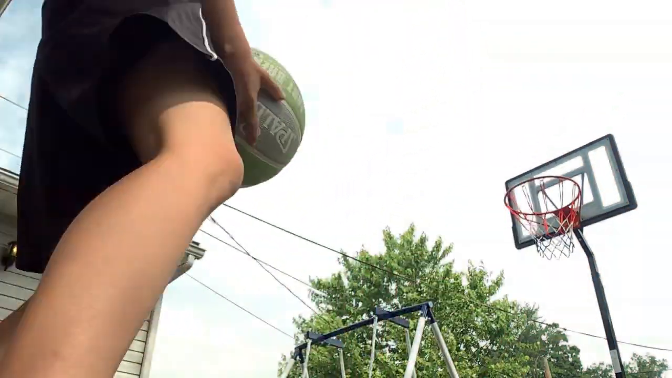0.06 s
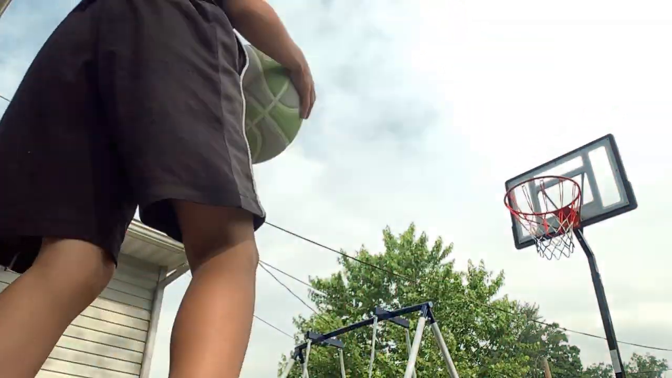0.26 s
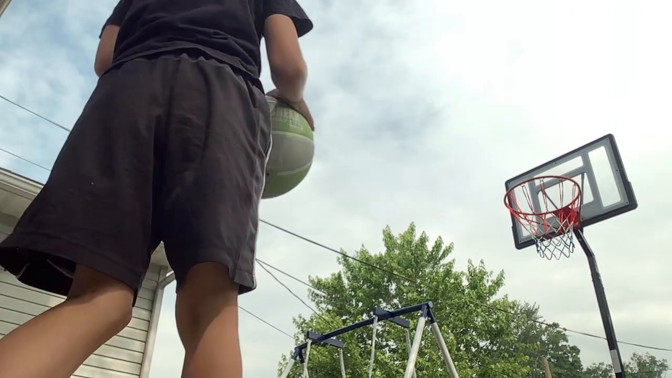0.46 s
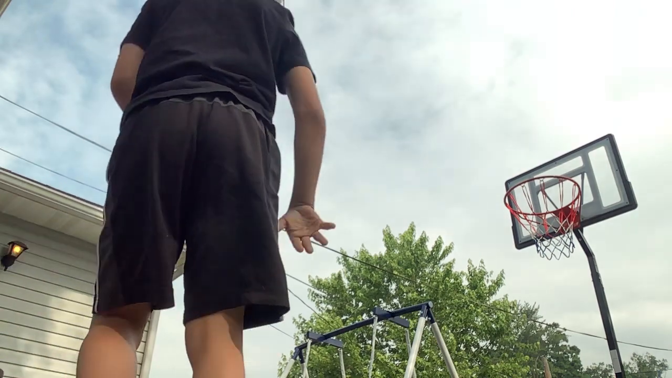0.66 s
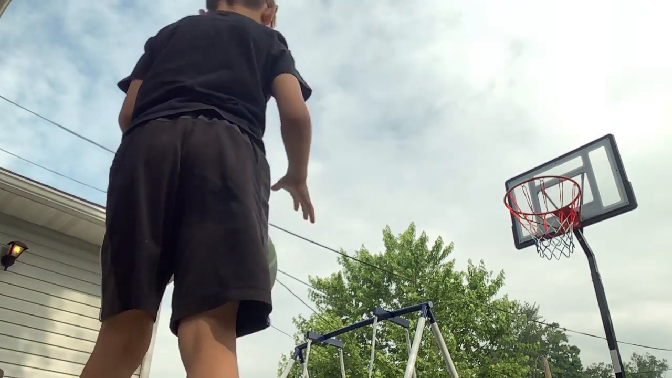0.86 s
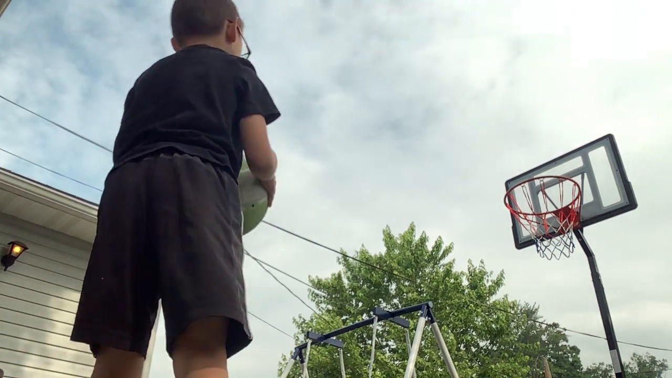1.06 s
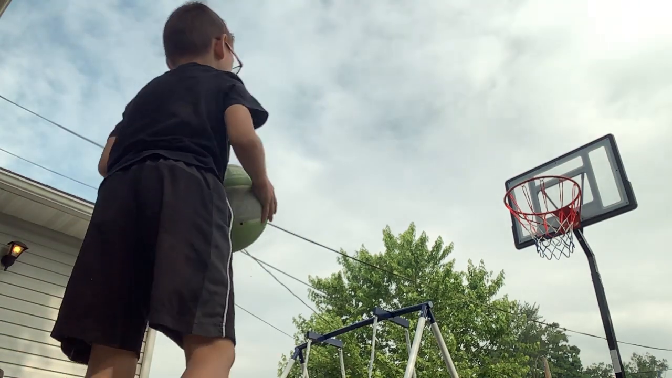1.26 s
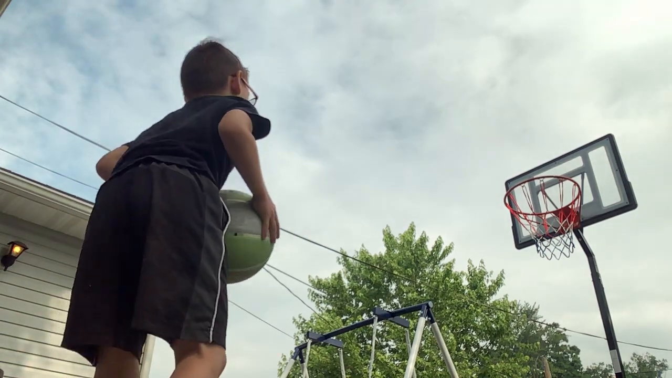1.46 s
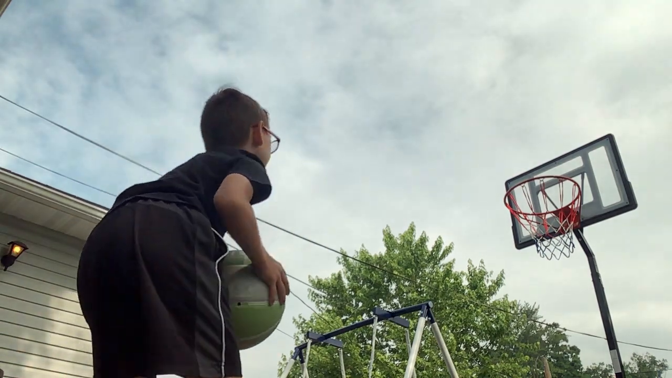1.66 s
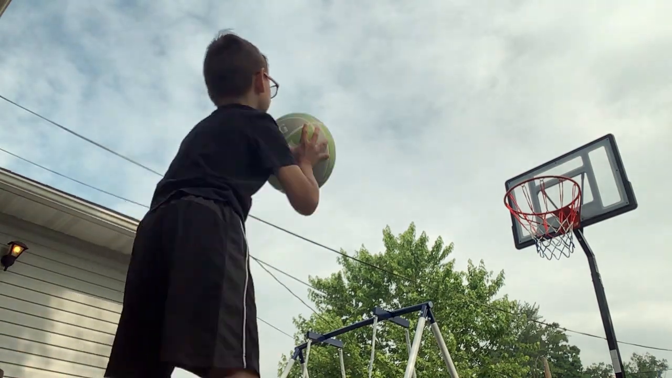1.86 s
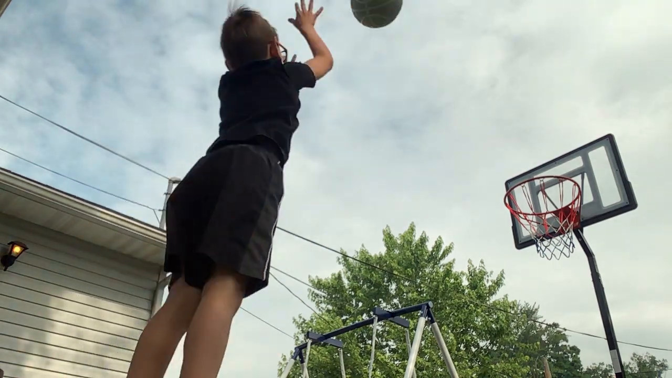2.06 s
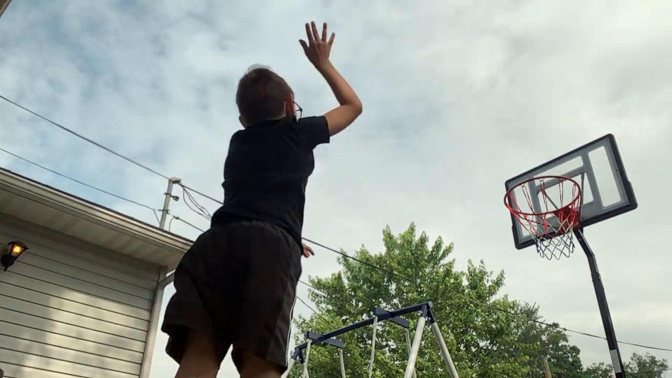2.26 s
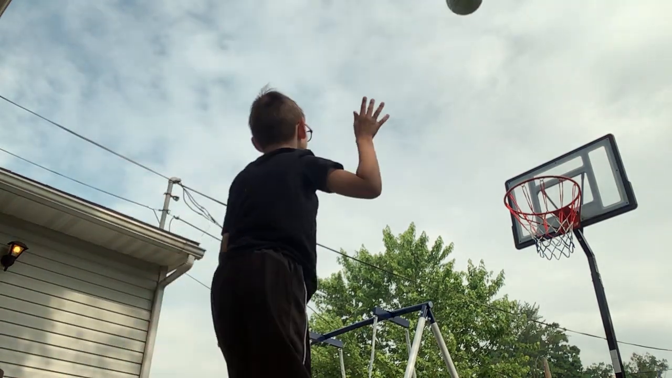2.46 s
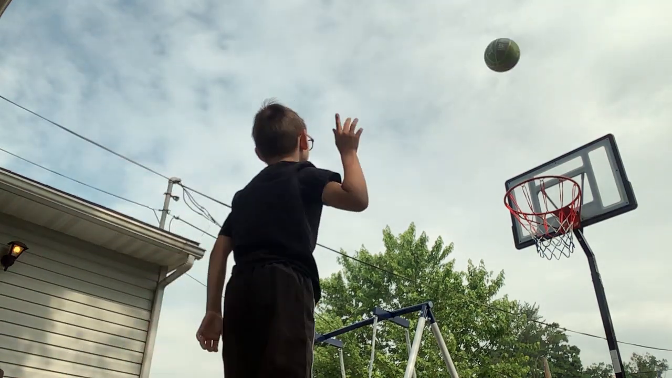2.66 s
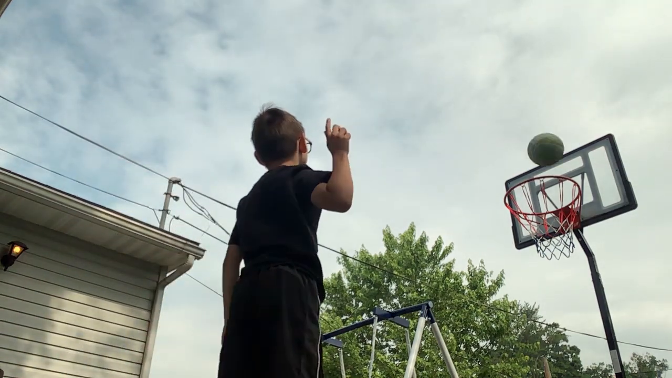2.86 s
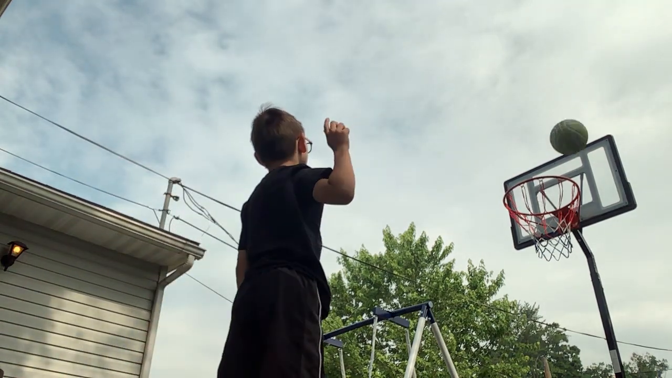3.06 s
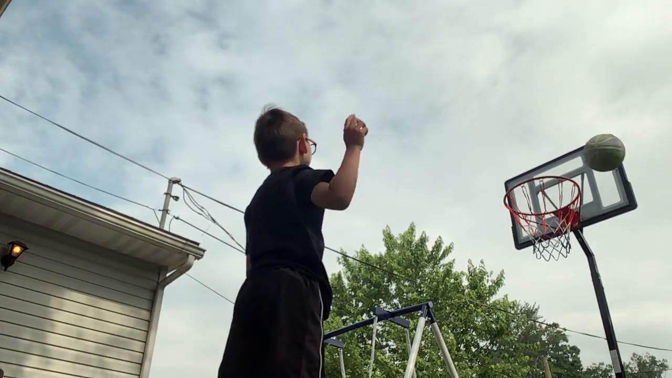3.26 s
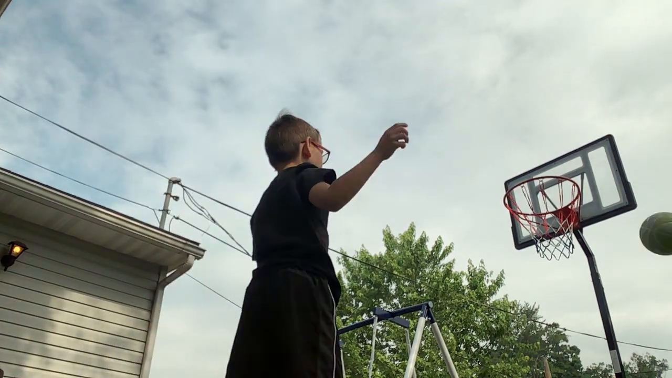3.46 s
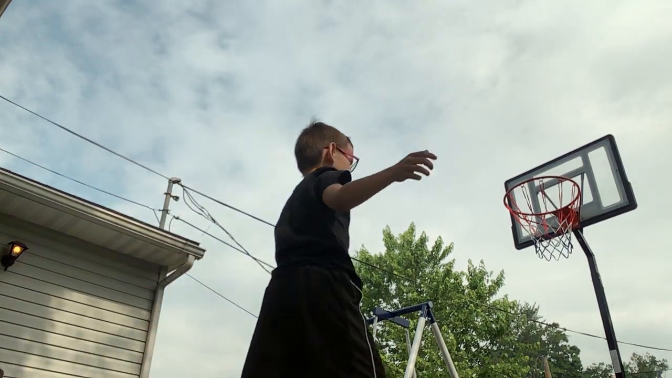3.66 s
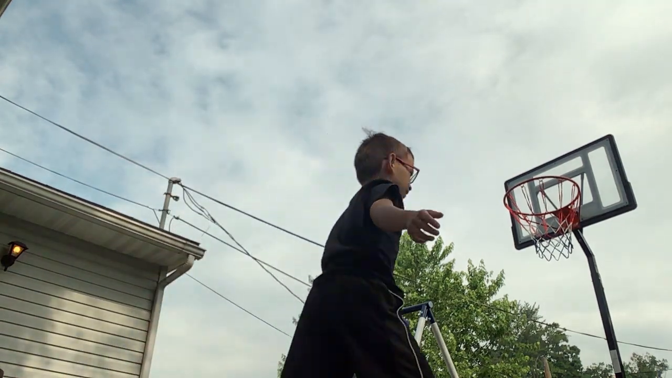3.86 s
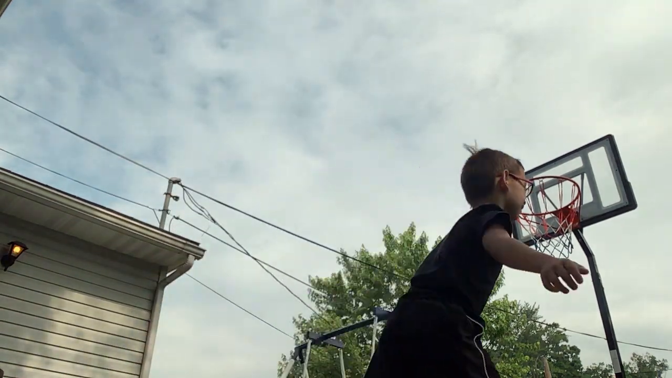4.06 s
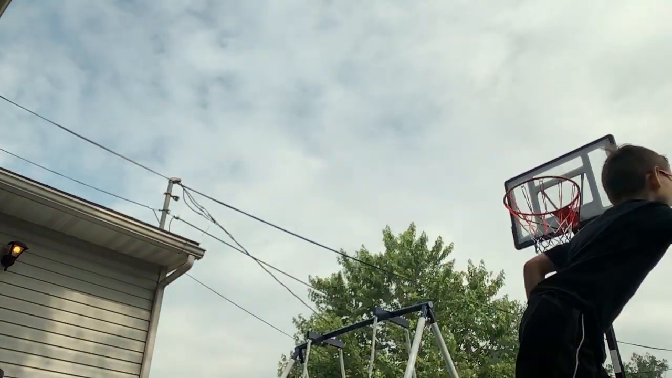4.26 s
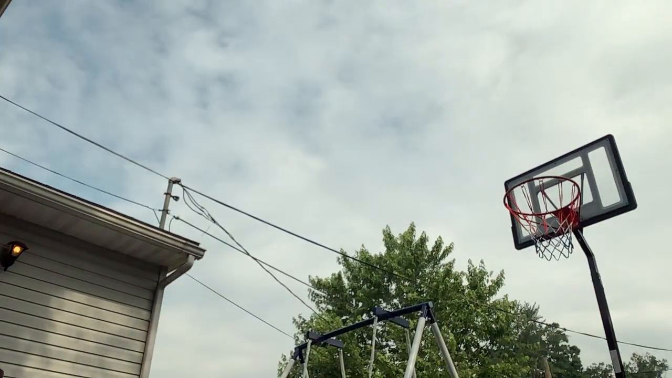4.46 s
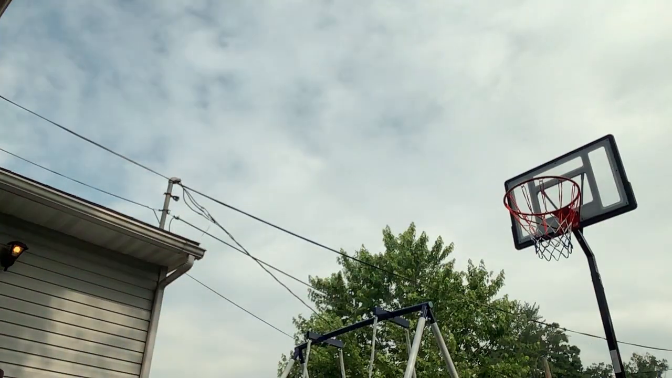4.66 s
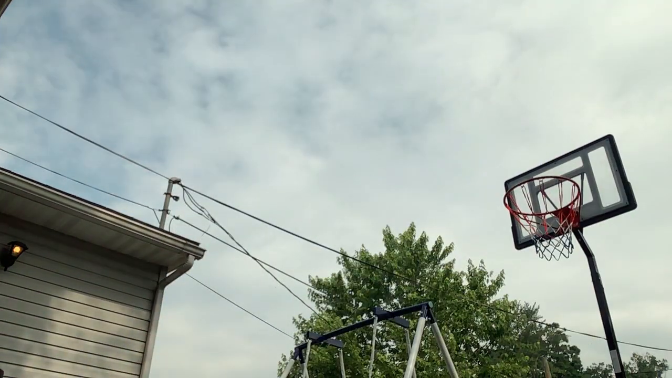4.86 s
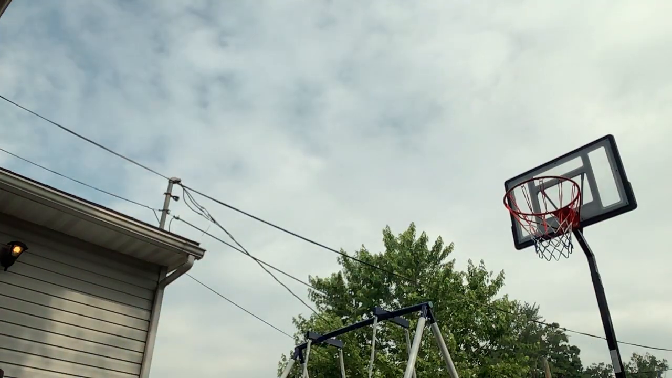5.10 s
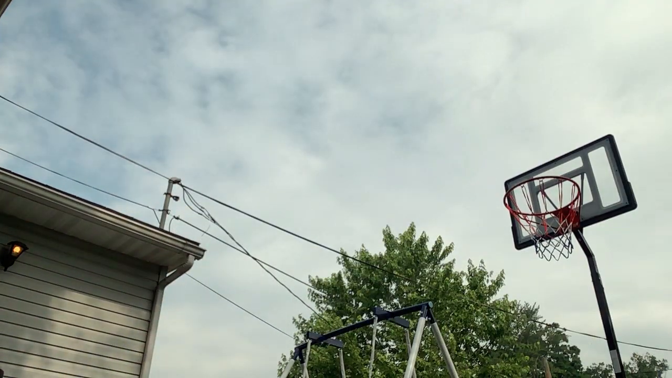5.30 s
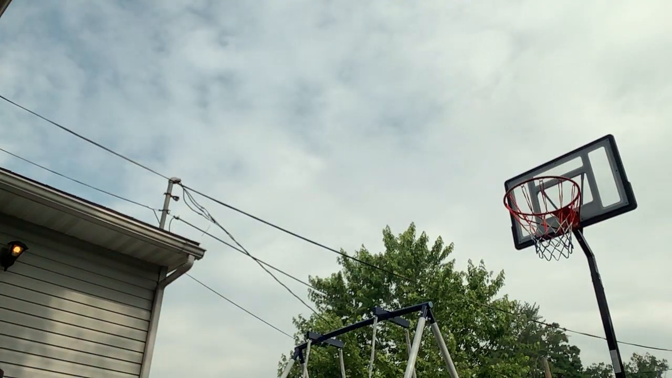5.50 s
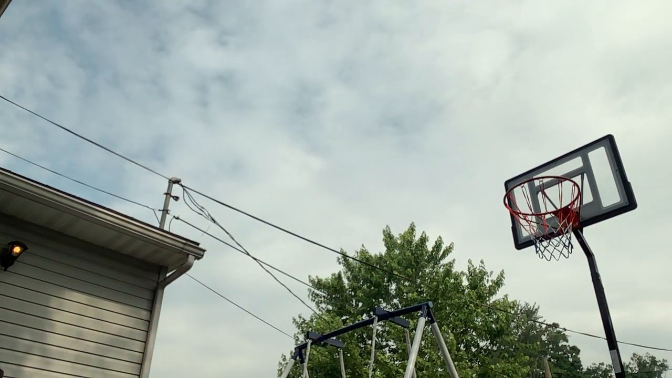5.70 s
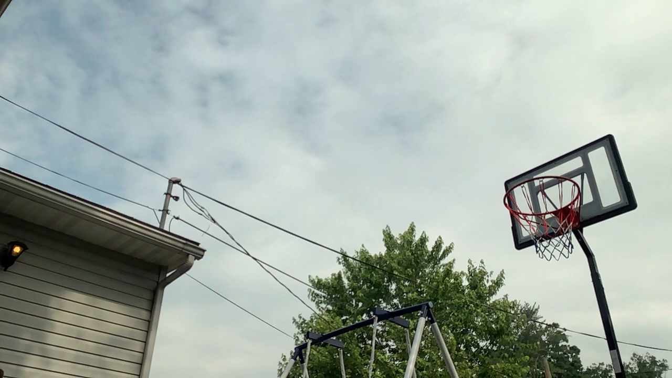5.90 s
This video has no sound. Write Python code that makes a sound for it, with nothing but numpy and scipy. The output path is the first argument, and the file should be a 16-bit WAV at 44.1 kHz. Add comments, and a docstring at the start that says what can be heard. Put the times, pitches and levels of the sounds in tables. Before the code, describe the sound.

A quiet backyard with low distant traffic, a faint wavering hum and sparse, weak, high bird chirps. Shoe soles drag on grit at the very start, then a crisp scrape and small step come at about 0.5 s. At 0.7 s a basketball hits the paving close by: a loud hollow thump, falling in pitch, with a ringing slap and a trace of crushed sand. A small step follows at 1.0 s, then a landing step and gritty scuffs around 2.3 and 2.6 s. At 2.9 s the ball hits the hoop: a brief steel clang and loose clatter, with a rapid low shudder of the backboard fading by about 3.2 s. The ball lands at 3.8 s, duller, with a strong wall echo, and bounces again at 4.8 and 5.4 s, each weaker. Footsteps thud near 4.7, 5.0 and faintly 5.7 s; raspier chirps sound near 4.6 s. Ground-level phone pickup, little deep bass.

```python
"""Backyard paving between house walls: a basketball is dribbled once and shot at a portable hoop.
The ball is thumps of falling pitch, ringing slaps and crushed sand; wall echoes are dulled delayed copies.
Rim and backboard are decaying modes, the clatter decaying noise, the shudder a train of thumps.
Shoes scuff and step in bands of grainy noise and small thuds.
Behind: gliding chirps smeared by trees, and a town of coloured noise with a wavering hum."""
import sys
import numpy as np
from scipy import signal
from scipy.fft import rfft, irfft
from scipy.io import wavfile
from scipy.ndimage import uniform_filter1d

SR = 44100
rng = np.random.default_rng(int(sys.argv[2]) if len(sys.argv) > 2 else 0)


def to_wav(sig):
    """Store sig (one row per channel, or 1-D mono) as 16-bit WAV at the path in sys.argv[1].

    Samples outside -1..1 are clipped; the rate is SR.
    """
    pcm = np.clip(np.atleast_2d(sig), -1, 1) * 32767
    pcm = np.round(pcm).astype(np.int16)
    wavfile.write(sys.argv[1], SR, pcm.T)  # frames by channels


N = 261760
AGE_S = np.arange(int(0.8 * SR)) / SR  # time base of one event


def undb(db):
    """Decibels to gain."""
    return 10 ** (np.asarray(db) / 20)


def unit(x):
    """Scale to rms 1."""
    return x / np.sqrt(np.mean(x ** 2))


def noise():
    """White noise, one event long."""
    return rng.standard_normal(len(AGE_S))


def add(out, start_s, x):
    """Mix x into out from start_s."""
    i = max(int(round(start_s * SR)), 0)
    out[i:i + len(x)] += x[:max(len(out) - i, 0)]


def lowpass(x, cutoff_hz, order=2):
    """Butterworth low-pass."""
    sos = signal.butter(order, min(cutoff_hz, SR / 2 - 100), fs=SR, output="sos")
    return signal.sosfilt(sos, x)


def log_hz(n):
    """Log frequency of each bin of an n-point spectrum."""
    return np.log(np.maximum(np.fft.rfftfreq(n, 1 / SR), 1))


def colour(x, points):
    """Shape x by (f/Hz, level/dB) points; rms 1."""
    hz, db = np.transpose(points)[:2]
    gain = undb(np.interp(log_hz(len(x)), np.log(hz), db))
    return unit(irfft(rfft(x) * gain, len(x)))


def ring(modes, blur=0.0):
    """Sum of decaying sines; blur, a share of pitch, widens each line by random phase drift."""
    out = 0
    for hz, db, t60_s in modes:
        drift = np.cumsum(noise()) * np.sqrt(2 * np.pi * abs(blur) * hz / SR)
        out = out + undb(db - 60 * AGE_S / t60_s) * np.sin(2 * np.pi * hz * AGE_S + drift)
    return out


def dense_ring(bands):
    """Countless modes: noise whose bands each die at their own pace."""
    spectrum = rfft(colour(noise(), bands))
    log_f = log_hz(len(AGE_S))
    hz, _, t60_s = np.transpose(bands)
    out = 0
    for weights, decay_s in zip(np.eye(len(hz)), t60_s):
        band = irfft(spectrum * np.interp(log_f, np.log(hz), weights), len(AGE_S))
        out = out + band * undb(-60 * AGE_S / decay_s)
    return out


def thump(hz, swell_s, sag=0.28, tight=9.1):
    """Soft thump: cycles swell to swell_s, pitch falling through hz there, then die."""
    u = AGE_S / swell_s
    pitch_hz = hz * (1 + sag * (1 - np.minimum(u, 2)))
    cycles = np.cumsum(pitch_hz) / SR
    cycles_at_peak = np.interp(swell_s, AGE_S, cycles)
    envelope = (u * np.exp(1 - u)) ** tight
    return -envelope * np.cos(2 * np.pi * (cycles - cycles_at_peak))


def walk(rate_hz):
    """Smoothed random steps at rate_hz; rms 1 over the scene."""
    k = int(SR / rate_hz)
    held = np.repeat(rng.standard_normal(N // k + 1), k)[:N]
    return unit(uniform_filter1d(held, k))


# ball on the ground: [t/s, thump level/dB, thump f/Hz, knock f/Hz, slap level/dB, slap cut-off f/Hz,
# grit level/dB, wall echo level/dB re the hit]
BALL_BOUNCES = [(0.7148, -10.5, 127, 320, -8.5, 2200, -32.5, -18.5),
                (3.7644, -13, 127.7, 725, -21, 1300, -57, -6.5),
                (4.799, -17.5, 118, 480, -20.5, 730, -52.5, -10.5),
                (5.3562, -22, 237, 373, -33, 714, -68, -13)]
# ringing colour of the ball's slap: low body, a cluster near 1 kHz, faint higher lines:
# [f/Hz, level/dB, t60/s]
SLAP_MODES = [(254, 4, 0.037), (437, -2, 0.074), (677, -15.5, 0.015), (1142, 1.5, 0.028),
              (1330, -9.5, 0.035), (1000, -9.5, 0.065), (1570, -47, .1), (1620, -30, 0.13),
              (2274, -19, .035), (2810, -24.5, 0.071), (3550, -44.5, 0.15), (5033, -45.5, .15)]
# sand crushed under the ball: [f/Hz, level/dB]
SAND_COLOUR = [(250, 5.5), (600, 3), (1400, 1), (2900, 0), (4500, -13.5), (8000, -19), (16000, -29)]
THUMP_SWELL_CYCLES = 2.036  # cycles of its nominal pitch up to the peak
KNOCK_DB, KNOCK_SWELL_CYCLES = -9.5, 1.617  # first touch; re the thump
PAVING_DB, PAVING_TOP_HZ = -17, 740  # dull crunch; re the thump
LAND_S, REBOUND_S, LAND_DB = 0.00343, 0.00676, -8  # REBOUND_S after landing; LAND_DB re the slap
CONTACT_S, SAND_FALL_S = 0.00098, 0.0027
SKITTER_DB, SKITTER_T60_S = -19, 0.36
WALL_DELAY_S, WALL_TOP_HZ = 0.027, 430  # nearest house wall
FAR_WALL_RATIO, FAR_WALL_DB = 1.7, -3  # delay and level re the nearest wall


def ball():
    """Ball knocks and thumps, slaps on landing and again on springing back; two walls answer."""
    out = np.zeros(N)
    slap_ring = ring(SLAP_MODES)
    slap_ring /= np.abs(slap_ring).max()
    contact = 1 - np.exp(-AGE_S / CONTACT_S)  # contact patch spreads
    crack = 2 * np.exp(-AGE_S / SAND_FALL_S)
    skitter = undb(SKITTER_DB - 60 * AGE_S / SKITTER_T60_S)
    for t_s, thump_db, hz, knock_hz, slap_db, slap_hz, grit_db, echo_db in BALL_BOUNCES:
        sand = contact * (crack + skitter) * colour(noise(), SAND_COLOUR)
        paving = undb(PAVING_DB) * lowpass(sand, PAVING_TOP_HZ)
        body = thump(hz, THUMP_SWELL_CYCLES / hz, sag=0.54)
        knock = undb(KNOCK_DB) * thump(knock_hz, KNOCK_SWELL_CYCLES / knock_hz, sag=0.33, tight=4.8)
        hit = undb(thump_db) * (body + knock + paving) + undb(grit_db) * sand
        slap = undb(slap_db) * lowpass(slap_ring * contact, slap_hz, order=3)
        add(hit, LAND_S, undb(LAND_DB) * slap)
        add(hit, LAND_S + REBOUND_S, -slap)
        echo = undb(echo_db) * lowpass(hit, WALL_TOP_HZ, order=3)
        add(out, t_s, hit)
        add(out, t_s + WALL_DELAY_S, echo)
        add(out, t_s + FAR_WALL_RATIO * WALL_DELAY_S, undb(FAR_WALL_DB) * echo)
    return out


# ball against the rim, then the loose mount rattling: [t/s, clatter level/dB, ring level/dB]
HOOP_HITS = [(2.9265, -39, -66), (2.9414, -28.5, -36), (2.967, -35, -57.5), (3.0478, -47, -51),
             (3.186, -65, -66), (3.283, -69, -69)]
# steel rim and bracket: [f/Hz, level/dB, t60/s]
RIM_MODES = [(510, -8, 0.52), (760, 3, 0.23), (847, 2.5, 0.15), (965, -9, 0.093), (1176, -3.5, 0.3),
             (1436, -4.5, 0.18), (1507, 6.5, 0.16), (1526, -12, 0.39), (1670, -1.5, 0.18), (1904, 1, 0.11),
             (1956, -10, 0.29), (2050, 4, 0.044), (2070, 0.5, 0.076), (2230, -12, 0.28), (2410, -7.5, 0.31),
             (2630, 1.5, 0.1), (2960, 1, 0.13), (3170, -24, 0.27), (3680, -28, 0.16), (3940, -2.5, 0.14),
             (4760, -14, 0.18), (5260, -12, 0.33), (6700, -11.5, 0.17), (7500, -7.5, 0.097),
             (11400, -29, 0.25), (10800, -33, 0.23)]
# clatter of the hoop: [f/Hz, level/dB, t60/s]
CLATTER_BANDS = [(153, 9, 0.83), (397, -0.5, 0.63), (834, -1, 0.26), (1140, -9, 0.4), (1690, 0.5, 0.091),
                 (2850, -13, 0.52), (4070, -16.5, 0.38), (7600, -21.5, 0.26), (9900, -27.5, 0.29),
                 (11600, -20, 0.22), (12900, -29, 0.19), (16000, -26, 0.2)]
# backboard panel: [f/Hz, level/dB, t60/s]
BOARD_MODES = [(78, 0, .45), (112, -0.5, 1), (154.5, -7, 0.29), (202, 3.5, 0.77)]
BOARD_T_S, BOARD_DB = 2.962, -35
CHATTER_DB, CHATTER_RATE_HZ, GIVE_S = 2.5, 220, 0.00045


def hoop():
    """Rim clangs and chatters in its mount; the backboard shudders and booms."""
    out = shudder()
    steel = ring(RIM_MODES, blur=0.0087)
    give = 1 - np.exp(-AGE_S / GIVE_S)  # rubber and springs soften each contact
    for t_s, clatter_db, ring_db in HOOP_HITS:
        chatter = undb(CHATTER_DB * walk(CHATTER_RATE_HZ)[:len(AGE_S)])
        clatter = undb(clatter_db) * chatter * dense_ring(CLATTER_BANDS)
        add(out, t_s, give * (clatter + undb(ring_db) * steel))
    add(out, BOARD_T_S, undb(BOARD_DB) * ring(BOARD_MODES))
    return out


SHUDDER_START_S, SHUDDER_GAP_S, SHUDDER_SWELL_S, SHUDDER_COUNT = 2.9455, 0.0235, 0.014, 6
SHUDDER_HZ, SHUDDER_SAG_OCT_PER_S = 185, 7.4  # first swing, and the fall from it
SHUDDER_PEAK_S, SHUDDER_DB = 3.012, -19.5
SHUDDER_BUILD_DB_PER_S, SHUDDER_DIE_DB_PER_S = 106, 130


def shudder():
    """Backboard rocks on its pole: even swings build up and die, each a thump lower than the last."""
    out = np.zeros(N)
    for t_s in SHUDDER_START_S + SHUDDER_GAP_S * np.arange(SHUDDER_COUNT):
        build_db = SHUDDER_BUILD_DB_PER_S * (SHUDDER_PEAK_S - t_s)
        die_db = SHUDDER_DIE_DB_PER_S * (t_s - SHUDDER_PEAK_S)
        hz = SHUDDER_HZ * 2 ** (-SHUDDER_SAG_OCT_PER_S * (t_s - SHUDDER_START_S))
        add(out, t_s, undb(SHUDDER_DB - max(build_db, die_db)) * thump(hz, SHUDDER_SWELL_S))
    return out


def peak(lag_s, rise_s, fall_s, roundness=1):
    """Envelope reaching 1 at lag 0; roundness 1 is pointed, 2 a bell."""
    return np.exp(-np.maximum(-lag_s / rise_s, lag_s / fall_s) ** roundness)


# sole catching on the paving: [t/s at the peak, level/dB before band-limiting, fall/s, centre f/Hz]
SOLE_CATCHES = [(0.453, -47.5, 0.0018, 4000), (0.508, -24, 0.0022, 2660), (0.983, -59, .004, 4000),
                (2.2848, -36, 0.0086, 2000), (2.585, -47, .005, 3000), (4.284, -54, .004, 5000),
                (5.238, -61, 0.0036, 2200)]
# sole dragging loose grit: [t/s at the peak, level/dB before band-limiting, fall/s]
SOLE_DRAGS = [(0.021, -51.5, 0.017), (0.503, -46.5, 0.03), (1.945, -60.5, 0.014), (2.295, -45, 0.014),
              (2.344, -54, .025), (2.59, -54, 0.017), (2.889, -58.5, 0.012), (4.345, -62, 0.05)]
RISE_RATIO, LEAD_S = 0.84, 0.1  # rise re fall time; start ahead of the peak
TOE_LAG_S, TOE_DB, TOE_LENGTH_RATIO, TOE_PITCH_RATIO = 0.0187, -10, 0.56, 1.3  # re the heel
DRAG_HZ, DRAG_JERK_DB, DRAG_JERK_RATE_HZ = 5200, 3, 244  # band centre; stick and slip


def scuffs(roundness=1.4):
    """Heel, then toe, catch on the paving; soles also drag loose grit in jerks."""
    out = np.zeros(N)
    for t_s, db, fall_s, hz in SOLE_CATCHES:
        start_s = t_s - LEAD_S
        lag_s = AGE_S + start_s - t_s
        toe_lag_s = (lag_s - TOE_LAG_S) / TOE_LENGTH_RATIO
        heel = peak(lag_s, RISE_RATIO * fall_s, fall_s, roundness)
        toe = undb(TOE_DB) * peak(toe_lag_s, RISE_RATIO * fall_s, fall_s, roundness)
        add(out, start_s, undb(db) * (heel * grit(hz) + toe * grit(hz * TOE_PITCH_RATIO)))
    for t_s, db, fall_s in SOLE_DRAGS:
        start_s = max(t_s - LEAD_S, 0)
        jerks_db = DRAG_JERK_DB * walk(DRAG_JERK_RATE_HZ)[:len(AGE_S)]
        envelope = peak(AGE_S + start_s - t_s, RISE_RATIO * fall_s, fall_s)
        add(out, start_s, undb(db + jerks_db) * envelope * grit(DRAG_HZ))
    return out


# colour of a scrape: [f/Hz, level/dB]
SOLE_COLOUR = [(100, -14), (400, 12.5), (1000, 0.5), (1550, 0.5), (2400, 3), (3600, -1.5), (5000, -4),
               (10000, -12), (16000, -15.5)]
# resonances of the sole: [f/Hz, Q, level/dB re the plain scrape]
SOLE_RESONANCES = [(1506, 7.1, 4.5), (2810, 14, -3), (4220, 34, 2.5)]
BAND_RATIO = 2.46  # band edges lie this factor either side of the centre


def grit(hz, grain_db=4.5, grain_samples=12):
    """Grains of very unequal size cracking under a sole, in a band around hz."""
    sizes = np.repeat(rng.exponential(size=len(AGE_S)), grain_samples)[:len(AGE_S)].clip(0, 3)
    scrape = colour(undb(grain_db * sizes) * noise(), SOLE_COLOUR)
    resonant = scrape
    for f_hz, q, db in SOLE_RESONANCES:
        b, a = signal.iirpeak(f_hz, q, fs=SR)
        resonant = resonant + undb(db) * signal.lfilter(b, a, scrape)
    band = lowpass(unit(resonant), hz * BAND_RATIO, order=1)
    return band - lowpass(band, hz / BAND_RATIO, order=1)


# footfalls: [t/s, level/dB, f/Hz]
FOOTFALLS = [(0.527, -41.5, 166), (1.005, -40, 522), (2.269, -39.5, 320), (4.697, -34, 243),
             (5.025, -39.5, 300), (5.698, -55, 650)]
STEP_SWELL_CYCLES, TREAD_ROUGHNESS, TREAD_TOP_HZ = 1.73, 0.28, 370
STEP_CRUNCH_DB, STEP_CRUNCH_FALL_S, STEP_CRUNCH_TOP_HZ = -11, 0.011, 650  # level re the thud


def steps():
    """Soles land with a small rough thud and a dull crunch."""
    out = np.zeros(N)
    for t_s, db, hz in FOOTFALLS:
        swell_s = STEP_SWELL_CYCLES / hz
        tread = 1 + TREAD_ROUGHNESS * unit(lowpass(noise(), TREAD_TOP_HZ))
        thud = tread * thump(hz, swell_s, sag=0.45, tight=1.5)
        crunch = unit(lowpass(colour(noise(), SOLE_COLOUR), STEP_CRUNCH_TOP_HZ))
        crunch = crunch * peak(AGE_S - swell_s, swell_s / 2, STEP_CRUNCH_FALL_S)
        add(out, t_s, undb(db) * (thud + undb(STEP_CRUNCH_DB) * crunch))
    return out


# nearer chirps: [t/s, start f/Hz, fall/octaves, level/dB]
NEAR_CHIRPS = [(0.057, 5370, 0.11, -69.5), (1.234, 5360, .1, -76), (1.495, 5600, 0.22, -70),
               (1.595, 4900, 0.093, -72), (1.933, 5350, 0.23, -67), (2.113, 5800, 0.37, -66.5),
               (2.194, 4600, 0.18, -68), (3.50, 5480, .15, -75), (3.646, 3840, 0.009, -65.5),
               (4.486, 5830, 0.17, -72.5), (4.582, 6520, 1.6, -57), (4.703, 5580, 0.93, -57.5)]
FAR_CHIRP_COUNT, FAR_CHIRP_DB = 5, -77
FAR_CHIRP_HZ, FAR_CHIRP_SPAN_OCT, FAR_CHIRP_FALL_OCT = 4520, 0.3, 0.16


def birds():
    """A few nearer chirps, and faint ones at random times and pitches."""
    out = np.zeros(N)
    for t_s, hz, fall_oct, db in NEAR_CHIRPS:
        add(out, t_s, undb(db) * chirp(hz, fall_oct))
    for when, pitch in rng.random((FAR_CHIRP_COUNT, 2)):
        hz = FAR_CHIRP_HZ * 2 ** (FAR_CHIRP_SPAN_OCT * (pitch - 0.5))
        add(out, when * N / SR, undb(FAR_CHIRP_DB) * chirp(hz, FAR_CHIRP_FALL_OCT))
    return out


CHIRP_S, SCATTER_T60_S = 0.052, 0.27
FLUTTER_MIN_OCT, FLUTTER_PER_FALL, FLUTTER_TOP_HZ = 0.02, 0.2, 580


def chirp(hz, fall_oct):
    """Falling glide, raspier the further it falls, smeared by the trees it passes through."""
    u = np.minimum(AGE_S / CHIRP_S, 1)
    flutter_oct = FLUTTER_MIN_OCT + FLUTTER_PER_FALL * fall_oct
    flutter = flutter_oct * unit(lowpass(noise(), FLUTTER_TOP_HZ))
    pitch_hz = hz * 2 ** (flutter - fall_oct * u)
    note = np.sqrt(np.abs(np.sin(np.pi * u))) * np.sin(2 * np.pi * np.cumsum(pitch_hz) / SR)
    leaves = noise() * undb(-60 * AGE_S / SCATTER_T60_S)
    return signal.fftconvolve(note, leaves / np.linalg.norm(leaves))


# outdoor background: [f/Hz, level/dB]
TOWN_COLOUR = [(28, -7), (42, 1), (70, -5), (125, 7), (165, -2), (240, -2), (400, -8), (750, -12),
               (1550, -21.5), (2400, -19), (3300, -26.5), (4300, -36), (5600, -46), (14000, -50.5),
               (16000, -67)]
TOWN_DB, TOWN_SWELL_DB, TOWN_SWELL_RATE_HZ = -51, 0.5, 3.41
HUM_HZ, HUM_WAVER, HUM_WAVER_RATE_HZ = 123, 0.02956, 26  # waver as a share of pitch
HUM_DB, HUM_SWELL_DB, HUM_SWELL_RATE_HZ = -58, 2, 19


def town():
    """Far traffic that swells a little, and a low hum wavering in pitch and level."""
    wash_db = TOWN_DB + TOWN_SWELL_DB * walk(TOWN_SWELL_RATE_HZ)
    wash = undb(wash_db) * colour(rng.standard_normal(N), TOWN_COLOUR)
    hum_pitch_hz = HUM_HZ * (1 + HUM_WAVER * walk(HUM_WAVER_RATE_HZ))
    hum = np.sin(2 * np.pi * np.cumsum(hum_pitch_hz) / SR)
    return wash + undb(HUM_DB + HUM_SWELL_DB * walk(HUM_SWELL_RATE_HZ)) * hum


# diffuse echo of the yard: [f/Hz, level/dB, t60/s]
YARD_BANDS = [(50, -14, 0.39), (124, 5, 0.4), (298, -10, 0.3), (644, 5.5, 0.21), (1140, -0.5, .25),
              (2200, -5, 0.35), (5000, -15.5, 0.34), (15600, -42, .18)]


def scene(yard_db=-27, yard_delay_s=0.012):
    """Ball, hoop and shoes with the yard's thin echo, over birds and town."""
    near = ball() + hoop() + scuffs() + steps()
    yard = dense_ring(YARD_BANDS)
    echo = signal.fftconvolve(near, yard / np.linalg.norm(yard))[:N]
    out = near + birds() + town()
    add(out, yard_delay_s, undb(yard_db) * echo)
    return out[None]


def record(dry, low_hz=46, top_hz=16000):
    """A phone on the ground: drops the deep bass and cuts the top."""
    f_hz = np.fft.rfftfreq(N, 1 / SR)
    bass_cut = 1 - 1 / (1 + (f_hz / low_hz) ** 10)
    thin = irfft(rfft(dry) * bass_cut, N)
    top_cut = signal.ellip(8, 0.2, 70, top_hz, fs=SR, output="sos")  # ripple, stop-band in dB
    return signal.sosfilt(top_cut, thin)


dry = scene()
out = record(dry)
to_wav(out)
```